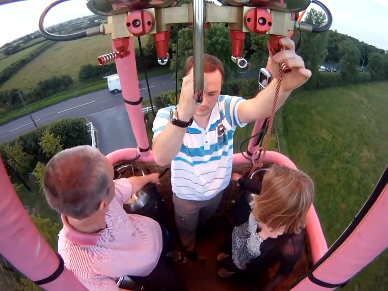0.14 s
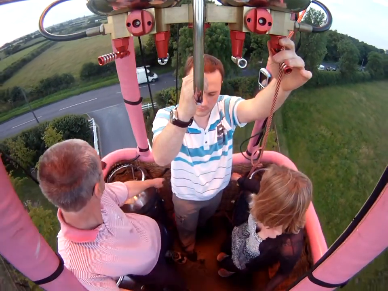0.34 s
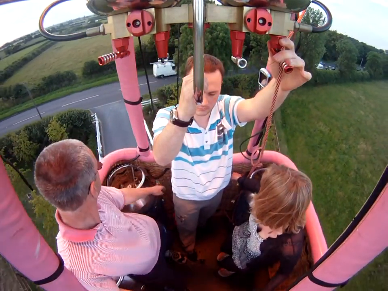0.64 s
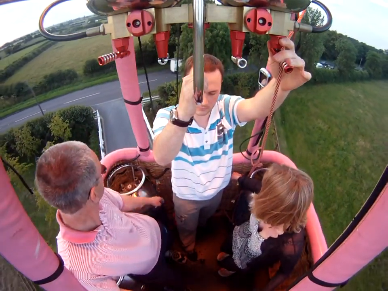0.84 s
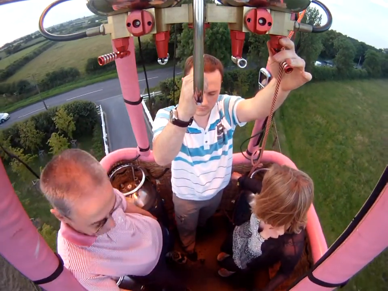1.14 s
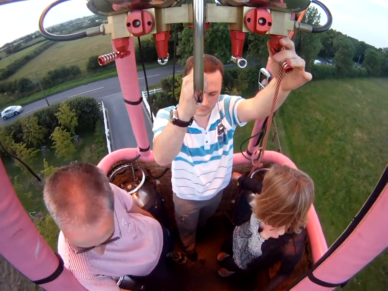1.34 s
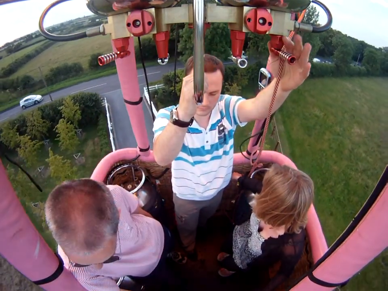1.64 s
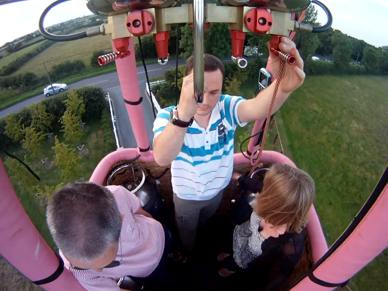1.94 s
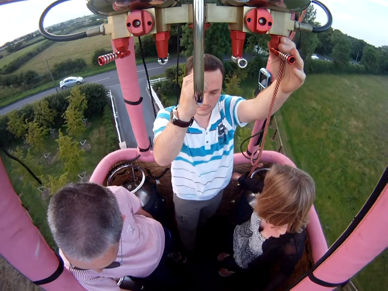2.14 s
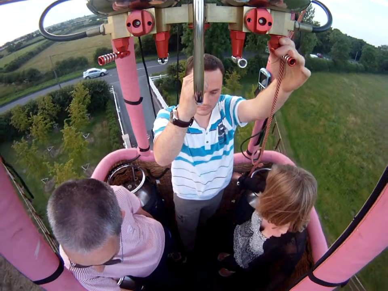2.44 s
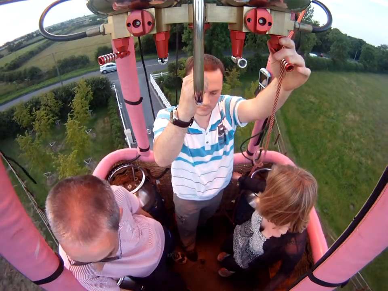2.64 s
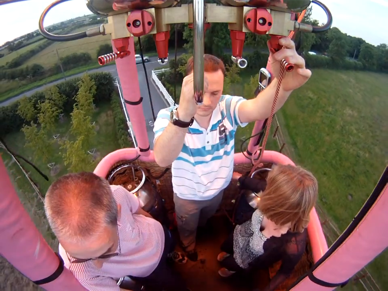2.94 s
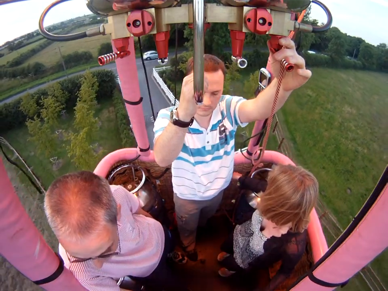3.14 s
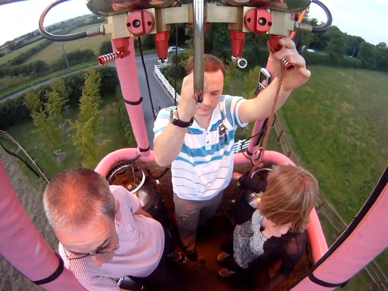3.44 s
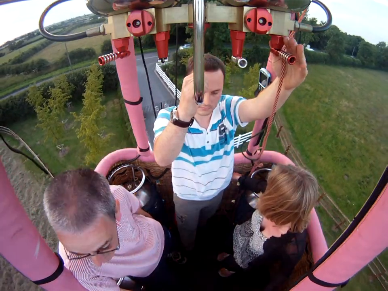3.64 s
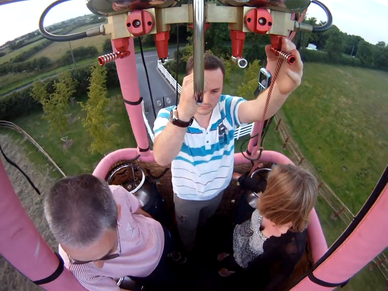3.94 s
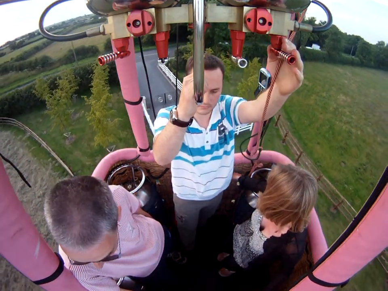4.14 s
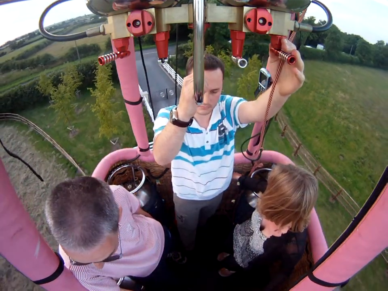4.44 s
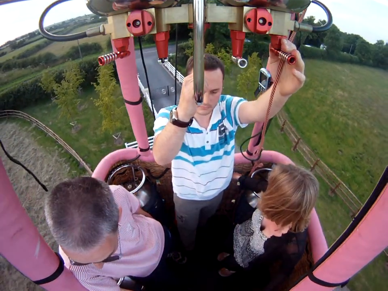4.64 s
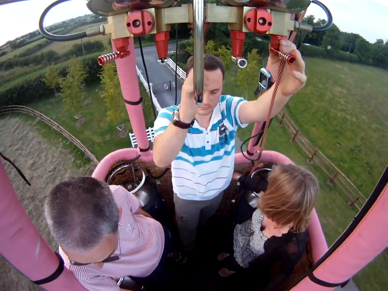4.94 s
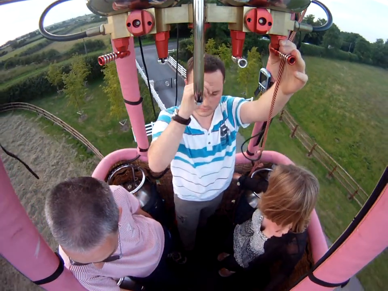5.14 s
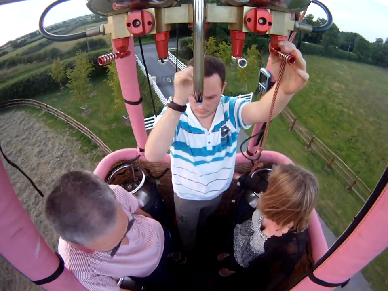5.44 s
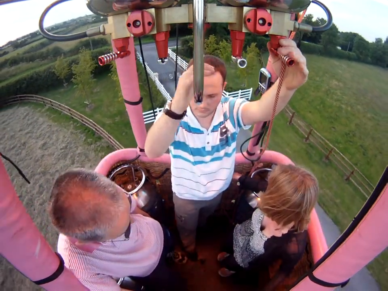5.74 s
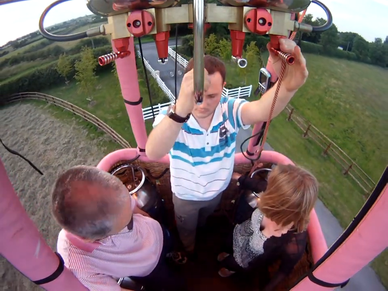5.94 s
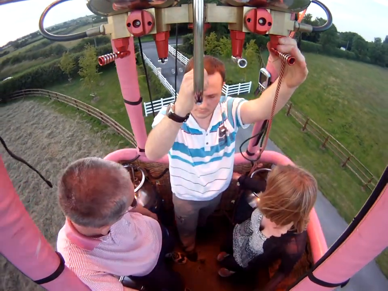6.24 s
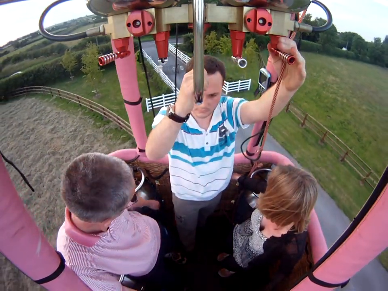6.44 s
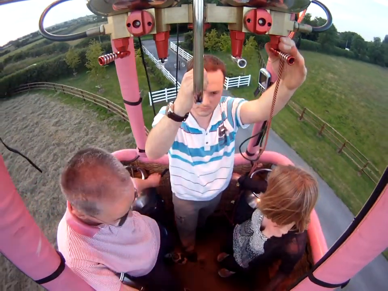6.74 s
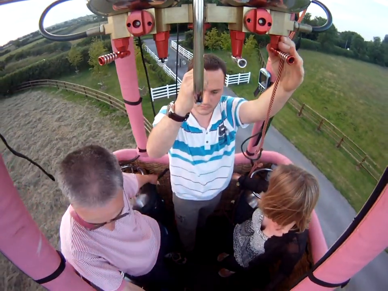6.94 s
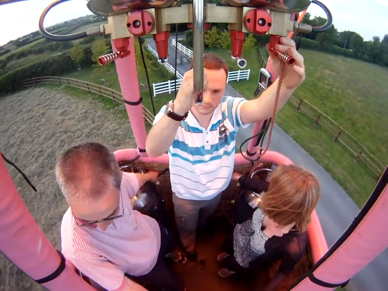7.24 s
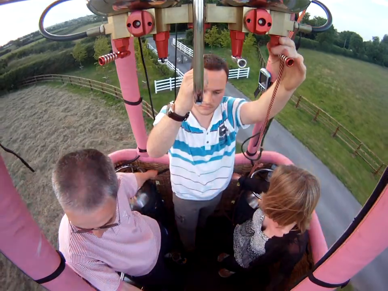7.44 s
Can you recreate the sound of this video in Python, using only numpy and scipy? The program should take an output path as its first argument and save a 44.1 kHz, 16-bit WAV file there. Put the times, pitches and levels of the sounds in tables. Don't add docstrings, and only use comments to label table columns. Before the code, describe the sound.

Hot air balloon burner roars in one long blast, then a second, then five short bursts, with lever clicks and a tube knock between.

```python
import sys
import numpy as np
from scipy import signal
from scipy.fft import rfft, irfft, next_fast_len
from scipy.io import wavfile
from scipy.ndimage import uniform_filter1d, map_coordinates

SR = 44100
rng = np.random.default_rng(int(sys.argv[2]) if len(sys.argv) > 2 else 0)


def master_out(mix):
    frames = np.transpose(np.atleast_2d(mix))
    ceiling = np.clip(frames, -1, 1)
    pcm = np.round(ceiling * 32767).astype(np.int16)
    wavfile.write(sys.argv[1], SR, pcm)


def invert_db(x):
    u = np.asarray(x, float) / 20
    return 10 ** u


N = 335160


def unit(x):
    return x / np.sqrt(np.mean(x ** 2) + 1e-20)


def wobble(rate_hz):
    knots = rng.standard_normal(int(N * rate_hz / SR) + 4)
    return map_coordinates(knots, [np.arange(N) * rate_hz / SR])


def noise(response, puffs=0):
    m = next_fast_len(N)
    kicks = rng.exponential(1, m) * (rng.random(m) < 120 / SR)
    source = rng.standard_normal(m) + puffs * unit(kicks)
    return unit(irfft(rfft(source) * response(np.fft.rfftfreq(m, 1 / SR)), m)[:N])


def shape(points):
    f, db = np.transpose(points)
    return lambda hz: invert_db(np.interp(np.log(hz + 1), np.log(f + 1), db))


def below(corner_hz):
    return lambda hz: 1 / np.sqrt(1 + (hz / corner_hz) ** 4)


def above(corner_hz):
    return lambda hz: np.sqrt(1 - below(corner_hz)(hz) ** 2)


def peak(hz, width_hz, db):
    return lambda f: invert_db(db) * f * width_hz / np.hypot(hz * hz - f * f, f * width_hz)


def add(track, start_s, sound):
    part = track[round(start_s * SR):][:len(sound)]
    part += sound[:len(part)]


def ringing(modes, t):
    out = 0
    for hz, db, t60_s in modes:
        out = out + invert_db(db + rng.normal(0, 0.58) - 60 * t / t60_s) * np.sin(2 * np.pi * hz * t)
    return out


# nearest point in seconds, level in dB, passing time in seconds.
LORRIES = [
    (2.54, -34.5, .14),
    (4.12, -36, 0.28),
]


def engines():
    t = np.arange(N) / SR
    drone = np.sqrt(2) * np.sin(2 * np.pi * np.cumsum(48 + 1.7 * wobble(5.9)) / SR)
    return drone * sum(invert_db(db) / (1 + ((t - s) / passing_s) ** 2) for s, db, passing_s in LORRIES)


def van_leaving():
    return np.exp(-np.arange(N) / SR / 1.6)


# frequency in Hz, level in dB per Hz.
PILOT = [(18, -37), (30, 0.5), (145, -5.5), (211, -6), (252, -6), (448, -7), (501, -6.5), (547, -4.5),
         (598, -5.5), (654, -8), (1940, -15), (3090, -23.5), (6000, -45.5), (7800, -98), (13200, -120)]


def road():
    colour = lambda hz: shape(PILOT)(hz) * above(800)(hz)
    level_db = -45.5 + 6.5 * van_leaving() + 0.48 * wobble(33)
    return invert_db(level_db) * noise(colour)


# first fizz level in dB, fizz fading in dB per second, pilot liveliness (0-1 or so).
LEFTOVER = [
    (-55, -8.5, 0.77),
    (-55.5, -33, 1.2),
    (-54, -33, 1),
    (-48, -47, 0.78),
    (-55, -45, 1),
    (-55, -65, 0.6),
]


def pilot():
    t = np.arange(N) / SR
    flares = []
    for (_, wide, shut), (_, _, lively) in zip(VALVE, LEFTOVER):
        flares.append(lively * (t > wide) * np.exp(-np.maximum(t - shut, 0) / 2.85))
    level_db = -37 + 2.5 * np.max(flares, axis=0) + 5.5 * van_leaving()
    colour = lambda hz: shape(PILOT)(hz) * below(800)(hz)
    return invert_db(level_db + 0.9 * wobble(35)) * noise(colour, puffs=0.35)


# start in seconds, level in dB.
KNOCKS = [
    (5.055, -31),
    (5.074, -19.5),
    (5.0892, -23),
    (5.165, -36),
    (5.2075, -32),
]
# frequency in Hz, level in dB, t60 in seconds.
TUBE = [(482, -4, .6), (489, -9, .35), (657, 0, .14), (735, -6, .11), (818, -15, .08), (3880, -36, .2),
        (4000, -38, .15), (4950, -40, .12)]


def tube():
    out, t = np.zeros(N), np.arange(SR // 2) / SR
    for s, db in KNOCKS:
        add(out, s, invert_db(db) * ringing(TUBE, t) * (1 - np.exp(-t / 0.002)))
    return out


# time in seconds, peak in dB, main ring in Hz, crack level in dB.
CLICKS = [(3.7933, -34, 2130, -28), (3.8094, -40, 2210, -17.5), (3.8352, -51, 2290, -17),
          (3.9113, -45, 2370, -22), (4.567, -43, 2320, -18), (5.0744, -37.5, 2220, -31),
          (5.9374, -29, 2280, -28), (6.371, -19, 2580, -19), (6.377, -18, 2250, -20),
          (6.4316, -28, 2490, -19), (6.4887, -35, 2220, -23), (6.6114, -42, 2240, -24),
          (7.0, -44, 2500, -19), (7.0693, -43, 2290, -14), (7.0988, -46, 2320, -16),
          (7.399, -25, 2620, -23), (7.4038, -16.5, 2264, -31), (7.4515, -39.5, 2310, -12),
          (7.4949, -47, 2300, -17), (7.5216, -41, 2500, -20)]
# frequency in Hz, level in dB, t60 in seconds.
LEVER = [(1900, -29, .025), (2630, -24, 0.021), (3010, -14, 0.033), (3720, -14, .025), (4330, -29, .1),
         (5020, -30.5, 0.094)]


def lever():
    out, t = np.zeros(N), np.arange(4000) / SR
    for s, db, hz, crack_db in CLICKS:
        ring = ringing([(hz, 0, 0.045), *LEVER], t)
        chatter = rng.standard_normal(400) ** 3 * invert_db(-60 * t[:400] / 0.029)
        rung = signal.fftconvolve(ring, chatter)[:4000]
        crack = invert_db(crack_db + 11 - 60 * t / 0.047) * uniform_filter1d(rng.standard_normal(4000), size=6)
        add(out, s - 0.002, invert_db(db + 7) * (rung / np.abs(rung).max() + crack))
    return out


# frequency in Hz, width in Hz, level in dB.
COIL = [(3780, 220, -1), (4970, 220, -4)]


def fizz(lumps):
    t = np.arange(N) / SR
    colour = lambda f: sum(peak(*mode)(f) for mode in COIL) + 0.1 * (f < 5500)
    hiss = unit(np.sqrt(lumps) * noise(colour))
    level = np.zeros(N)
    for (_, _, shut), (db, fading_db_per_s, _) in zip(VALVE, LEFTOVER):
        after_s = np.maximum(t - shut - 0.033, 0)
        level += invert_db(db + fading_db_per_s * after_s) * np.clip(after_s / 0.03, 0, 1)
    return level * hiss


# start in seconds, length in seconds, level in dB, first Hz, settled Hz.
WHISTLES = [(1.748, 0.22, -44.5, 2210, 2300), (1.993, 0.072, -46, 2270, 2430),
            (2.159, .07, -48, 2280, 2410), (2.24, 0.16, -49, 2225, 2330), (3.785, 0.072, -42, 2194, 2220),
            (3.851, .2, -47, 2304, 2364), (6.05, 0.046, -49, 2270, 2290), (6.44, 0.034, -48, 2250, 2340),
            (6.495, 0.11, -48.5, 2540, 2470), (6.61, .03, -48.5, 2240, 2260),
            (6.884, 0.046, -57, 2330, 2350), (7.065, .05, -47, 2320, 2330), (7.41, 0.06, -38.5, 2240, 2410),
            (7.49, 0.047, -43.5, 2380, 2480)]


def whistles(lumps):
    climb_s, edge_s, fade_db_per_s = 0.0495, 0.0093, -28
    out, t = np.zeros(N), np.arange(N) / SR
    breath = 0.92 + noise(lambda f: 1 / (1 + (f / 130) ** 2))
    waver_hz = 25.6 * wobble(30)
    for s, length, db, first_hz, settled_hz in WHISTLES:
        span = slice(round(s * SR), round((s + length + 2 * edge_s) * SR))
        age = t[span] - s
        hz = settled_hz + (first_hz - settled_hz) * np.exp(-age / climb_s) + waver_hz[span]
        turn = 2 * np.pi * np.cumsum(hz) / SR
        upper = invert_db(-15.5) / (1 + ((2.15 * hz - 5000) / 160) ** 2)
        tone = np.sin(turn) + upper * np.sin(2.15 * turn)
        edges = np.clip(2 * age / edge_s, 0, 1) * np.clip(1 - (age - length) / (2 * edge_s), 0, 1)
        out[span] += invert_db(db + fade_db_per_s * age) * edges * (lumps * breath)[span] * tone
    return out


def sputter():
    lumps = invert_db(1.4 * wobble(45))
    return fizz(lumps) + whistles(lumps)


# start in seconds, growing in seconds, dying in seconds, top in dB, first Hz.
WHUMP = [(0.139, 0.04, 0.0073, 24.5, 140.5), (.815, 0.0099, 0.0052, 13.5, 132),
         (0.989, 0.0097, 0.0056, 17.5, 181), (2.616, 0.027, 0.034, 21, 169.8),
         (2.958, 0.0094, .005, 19.5, 107), (3.298, 0.0065, 0.004, 5, 140),
         (5.758, 0.015, 0.0036, 17.5, 210.4), (5.783, 0.0046, 0.025, 23, 70), (5.951, 0.011, 0.009, 7, 89),
         (6.243, 0.058, 0.021, 20.5, 135), (6.718, 0.014, 0.01, 5.5, 323), (6.744, 0.01, 0.0073, 29, 94),
         (7.193, 0.021, 0.024, 14.5, 123), (7.245, 0.0073, 0.0067, 19, 99), (7.298, 0.0048, 0.022, 14, 97)]


def whumps():
    sag_per_s = 19.1
    out = np.zeros(N)
    unsteady_db = 1.96 * wobble(70)
    for s, growing, dying, db, first_hz in WHUMP:
        t = np.arange(round((growing + 0.092) * SR)) / SR
        grown = np.clip(t / growing, 0, 1)
        hz = first_hz * np.exp(-sag_per_s * growing * grown) * invert_db(unsteady_db[round(s * SR):][:len(t)])
        turn = 2 * np.pi * np.cumsum(hz) / SR
        size = invert_db(db - 16.9 * (1.5 - grown)) * np.clip(t / 0.0066, 0, 1)
        size = size * np.exp(-np.maximum(t - growing, 0) / dying)
        add(out, s, size * (0.72 * np.sin(turn) - 0.36 * np.cos(2 * turn) - 0.19 * np.sin(3 * turn)))
    return out


def opening(cracked, wide, shut, fall_s, linger_db, linger_s):
    t = np.arange(N) / SR
    rise = (t > cracked) * invert_db(-28 * np.clip((wide - t) / (wide - cracked), 0, 1))
    after = np.maximum(t - shut, 0)
    fall = (1 - invert_db(linger_db)) * np.exp(-(after / fall_s) ** 1.4)
    return rise * (fall + invert_db(linger_db) * np.exp(-after / linger_s))


# cracked open, wide open, let go, all in seconds.
VALVE = [
    (.084, .108, 1.655),
    (2.573, 2.605, 3.608),
    (5.716, 5.74, 5.88),
    (6.183, 6.194, 6.318),
    (6.687, 6.704, 6.828),
    (7.152, 7.163, 7.306),
    (7.552, 7.565, 7.7),
]
# jet in dB, flame in dB, plume in dB.
BLAST = [
    (-19.5, -7.5, -8),
    (-18.5, -7, -6.5),
    (-19.5, -7.5, -5.5),
    (-22.5, -12.5, -8.5),
    (-20, -5.5, -5.5),
    (-19.5, -7, -5),
    (-21, -19, -28),
]
# frequency in Hz, level in dB per Hz.
SPURT = [(71, -33), (120, -6.5), (437, -2), (568, 2), (669, -6), (1230, -19), (1940, -17), (2210, -10.5),
         (2870, -14.5), (3500, -26), (4120, -21), (4470, -21.5), (5010, -16), (5440, -28.5), (6000, -25.5),
         (7800, -65), (13200, -120)]
# frequency in Hz, level in dB per Hz.
JET = [(530, -3), (900, -5), (1170, -2.5), (1390, -11), (1580, -6.5), (2670, -1), (3060, -3), (3500, -12),
       (3760, -7.5), (4160, -12), (4880, -7.5), (5680, -19), (6000, -17.5), (7800, -57), (13200, -120)]
# frequency in Hz, level in dB per Hz.
FLAME = [(15, -41), (25, -0.5), (60, 3.5), (119, 3.5), (244, -4.5), (356, -8.5), (388, -9.5), (528, -10),
         (882, -25.5), (1500, -34), (1950, -74), (3300, -120)]


def burner():
    spurt, jet, flame, plume = np.zeros((4, N))
    for (cracked, wide, shut), (jet_db, flame_db, plume_db) in zip(VALVE, BLAST):
        lit = np.clip((np.arange(N) / SR - wide) / 0.048, 0, 1)
        flow = invert_db(jet_db) * opening(cracked, wide, shut, 0.012, -19, 0.14)
        spurt += np.sqrt(1 - lit) * flow
        jet += np.sqrt(lit) * flow
        flame += invert_db(flame_db) * lit * opening(cracked, wide, shut + 0.012, 0.0093, -15, 0.081)
        plume += invert_db(plume_db) * opening(cracked, wide + 0.052, shut + 0.012, 0.027, -14, 0.1)
    flicker = wobble(45)
    rush = unit(invert_db(2.65 * wobble(120)) * noise(shape(SPURT)))
    hiss = unit(invert_db(0.5 * flicker + 0.84 * wobble(90)) * noise(shape(JET)))
    burning = noise(lambda hz: shape(FLAME)(hz) * above(270)(hz), puffs=0.43)
    roar = unit(invert_db(1.2 * flicker + 0.67 * wobble(110)) * burning)
    rumble = noise(lambda hz: shape(FLAME)(hz) * below(270)(hz), puffs=1.1)
    return invert_db(7.0) * spurt * rush + jet * hiss + flame * roar + plume * rumble


def scene():
    return (engines() + road() + pilot() + tube() + lever() + sputter() + whumps() + burner())[None]


# start in seconds, clamping in seconds, depth in dB, held in seconds, recovery in seconds.
DUCKS = [(0.133, 0.023, -9, 1.56, .05), (0.162, .022, -19, 0.019, 0.11), (.53, .026, -4, 0, 0.015),
         (.822, .015, -4, 0, 0.038), (.995, .012, -5, 0, 0.052), (1.265, .02, -0.5, 0, .07),
         (2.622, 0.023, -9.5, 1.05, .05), (2.628, .02, -12, 0, .11), (2.96, 0.014, -3, 0.049, 0.035),
         (3.13, .026, -2, .08, 0.069), (3.31, 0.015, -2.5, 0.0058, 0.065), (5.764, .014, -17.5, .14, 0.077),
         (6.25, .012, -8.5, .1, .07), (6.286, .016, -12.5, 0.067, 0.069), (6.74, 0.024, -21, 0.085, 0.088),
         (6.745, 0.021, -10, 0.003, 0.076), (7.202, 0.015, -15.5, .14, 0.06)]


def gain_control():
    t = np.arange(N) / SR
    gain_db = np.full(N, -1.0)
    for s, clamping, db, held, recovery in DUCKS:
        clamped = np.clip((t - s) / clamping, 0, 1)
        after = np.maximum(t - s - clamping - held, 0)
        gain_db += db * clamped * np.exp(-(after / recovery) ** 1.35)
    return invert_db(gain_db)


def roll_off(x):
    return signal.sosfilt(signal.butter(12, 16610, fs=SR, output="sos"), x)


def record(dry):
    x = dry * gain_control()
    x = x / (1 + np.abs(x / 0.99) ** 8) ** (1 / 8)
    slow = signal.resample_poly(x, 40, 147, axis=1)
    held = signal.resample_poly(np.repeat(slow, 4, axis=1), 147, 160, axis=1)
    top_hz = 15350
    mix = irfft(rfft(held, N) * (np.fft.rfftfreq(N, 1 / SR) < top_hz), N)
    return roll_off(mix)


dry = scene()
out = record(dry)
master_out(out)
```